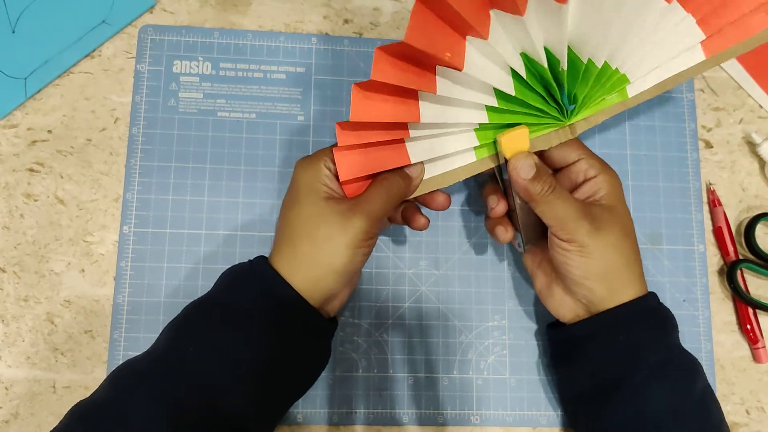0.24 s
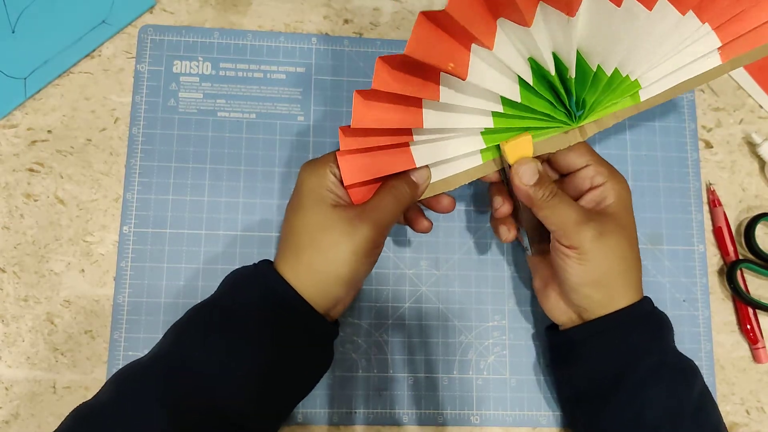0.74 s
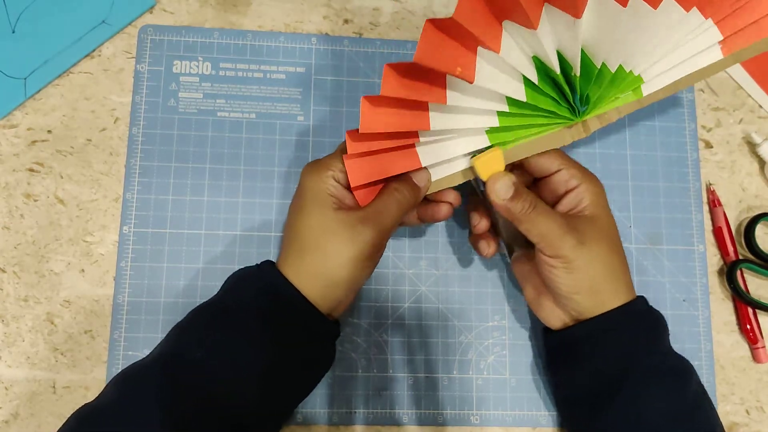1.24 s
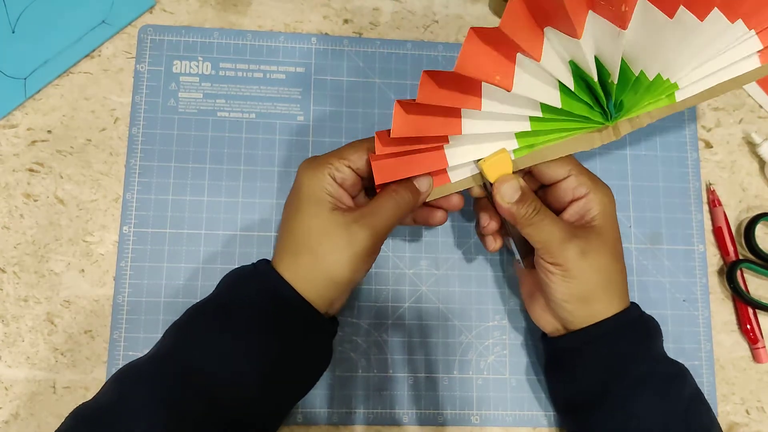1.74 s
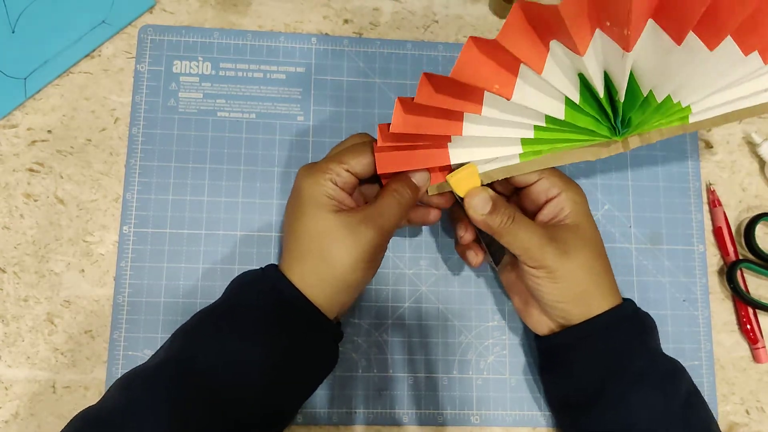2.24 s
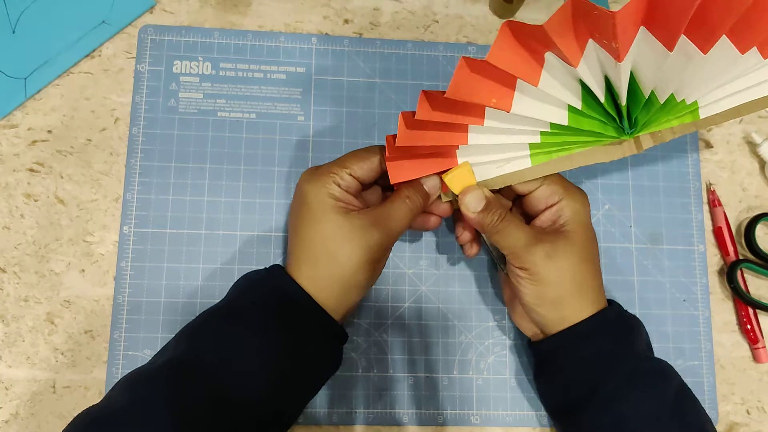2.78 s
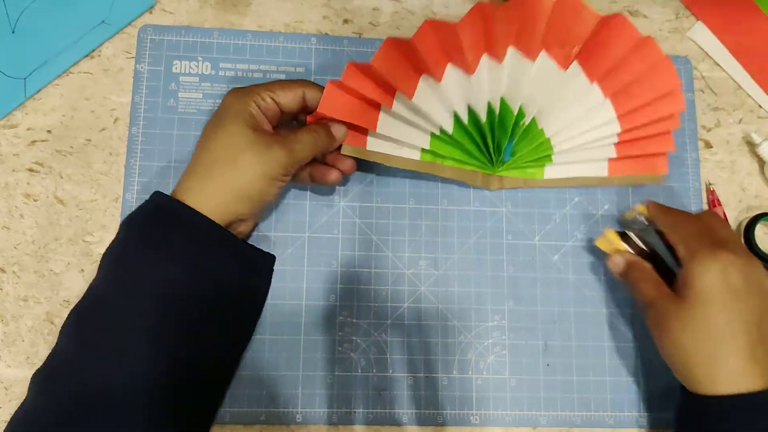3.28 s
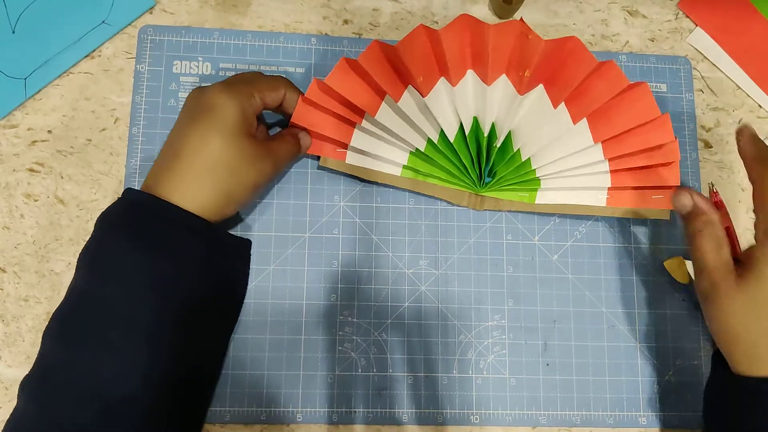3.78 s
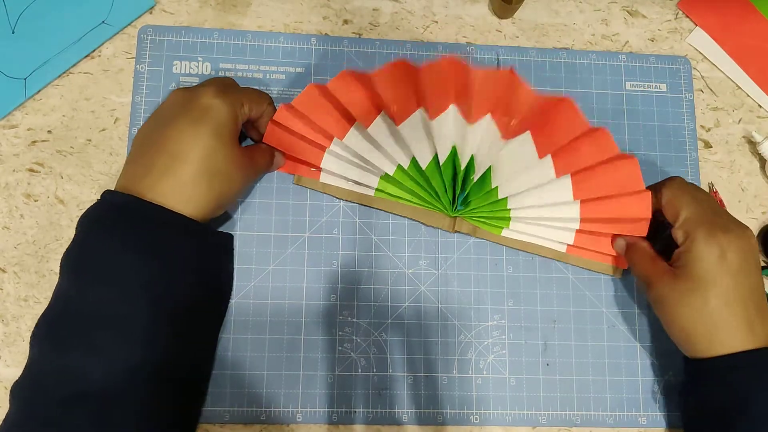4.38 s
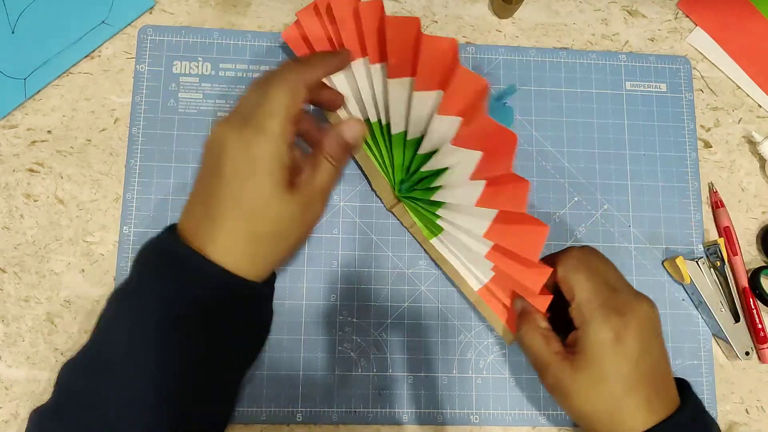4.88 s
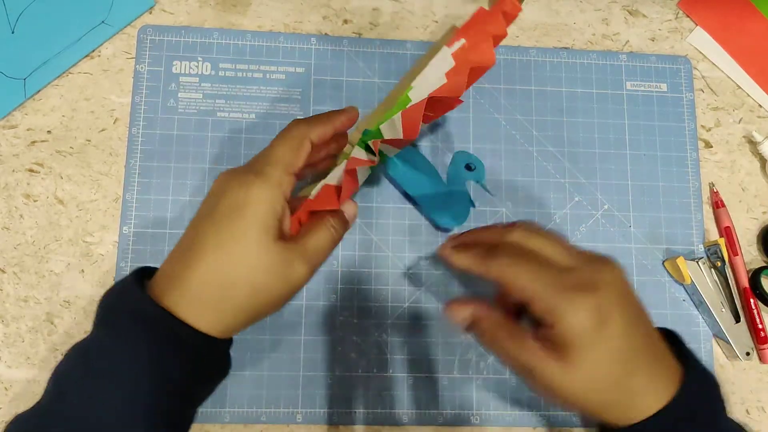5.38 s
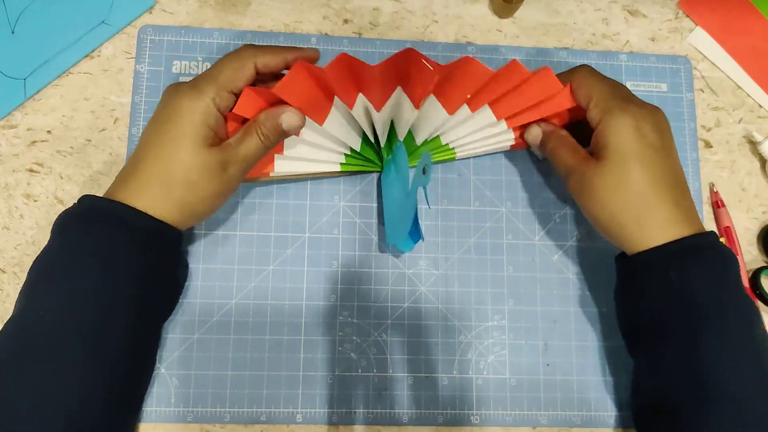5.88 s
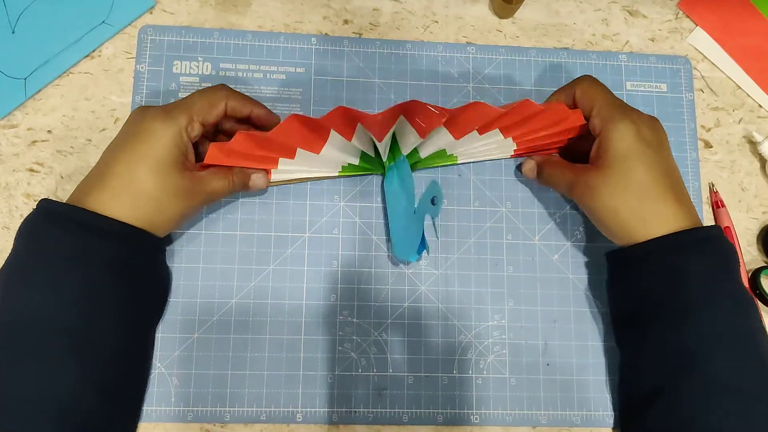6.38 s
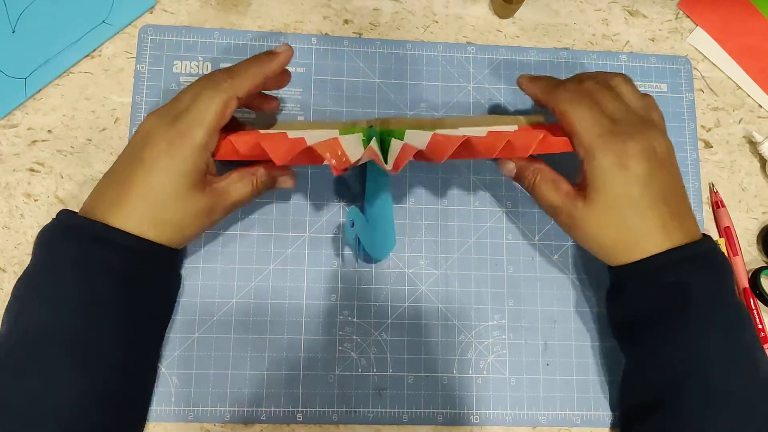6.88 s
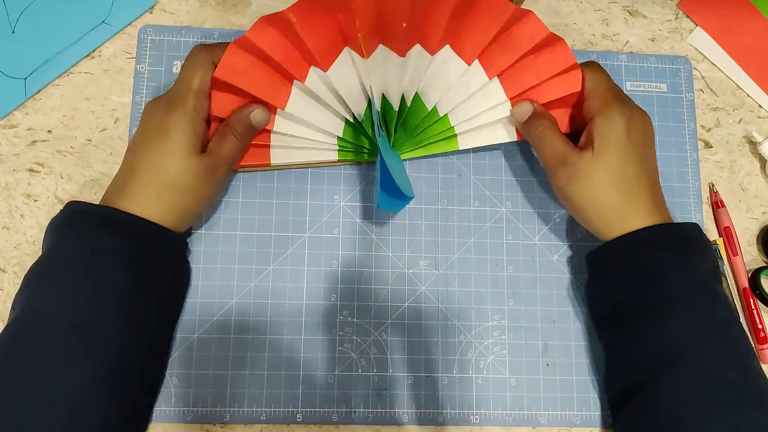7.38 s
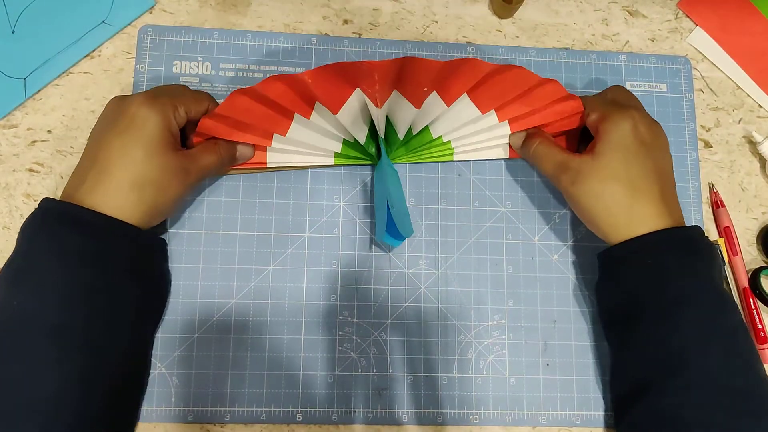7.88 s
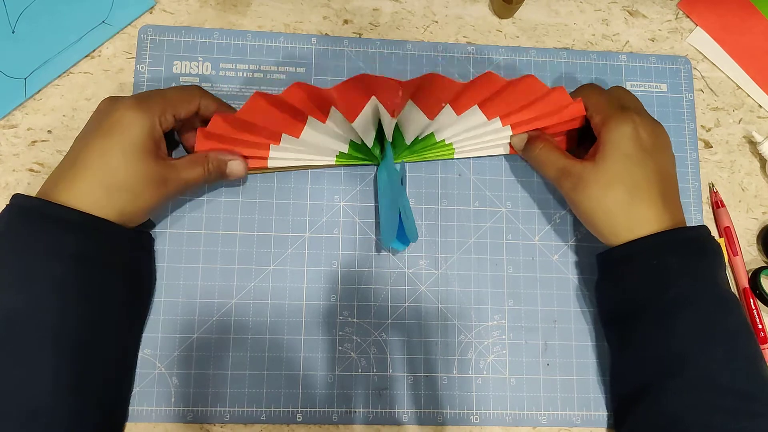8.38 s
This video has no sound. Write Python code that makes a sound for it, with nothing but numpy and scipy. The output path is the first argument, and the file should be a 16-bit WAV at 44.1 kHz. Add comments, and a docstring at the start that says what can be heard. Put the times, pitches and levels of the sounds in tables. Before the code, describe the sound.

Three sharp stapler snaps and a clack as it is put down, followed by quiet rustling and crinkling of pleated paper.

```python
"""Stapling a paper fan

At a craft table in a bare room, a small steel stapler snaps three times through a pleated paper fan
and is laid down; the fan is then turned and flexed by hand. Paper rustles, pleats drum, the table thuds.
Behind them, mains hum and a faint rumble swell and sink with the handling as the noise suppressor
on the camera's stereo microphone opens and shuts."""
import sys
import numpy as np
from scipy import signal
from scipy.fft import rfft, irfft, next_fast_len
from scipy.io import wavfile
from scipy.ndimage import uniform_filter1d, map_coordinates

SR = 44100
rng = np.random.default_rng(int(sys.argv[2]) if len(sys.argv) > 2 else 0)


def put_to_file(sound):
    """Save the sound as 16-bit audio at rate SR, in the file named by the first command-line argument."""
    columns = np.atleast_2d(sound).T  # one column per channel
    safe = np.clip(columns, -1, 1)
    whole_steps = np.round(safe * 32767)
    wavfile.write(sys.argv[1], SR, whole_steps.astype(np.int16))


N = 380583

# staples driven home: t/s, level/dB, then relative pleat knock/dB, spring/dB, thud/dB, air swing/dB
STAPLES = [(0.9938, -15.5, -11, -3.5, -26.5, 0.8), (1.9055, -10, -15.5, -0.5, -24, -4.5),
           (2.765, -11, -2.5, -5, -22.5, -9.5)]
# the fan jerks toward or away from the microphone: one sign per staple
SWING_DIRECTIONS = [-1, 1, 1]
# the stapler's jaws spring open or jingle: t/s, level/dB
JAW_RELEASES = [(1.1974, -35.5), (1.3745, -48), (2.112, -33.5), (2.9658, -38), (3.5868, -36.5)]
# small contacts and creases: t/s, level/dB, relative pleat knock/dB, thud/dB, tilt/(dB per octave)
CONTACTS = [(0.1524, -72, 21, -22, -3), (0.7363, -53.5, 11.5, -21, -6), (1.4524, -69, 29.5, -3, 2.5),
            (1.477, -50.5, 4, -24, -4), (2.4782, -76.5, 24.5, 9, -2.5), (2.5511, -53.5, 4, -20, -11),
            (2.5941, -54, 9, -11.5, -11.5), (3.2211, -44.5, -8, -24, 0.3), (3.2953, -37.5, -14, -15, -4.5),
            (3.3428, -44.5, 6.5, -13, -3.5), (3.4386, -50.5, 11.5, -28, 0.9),
            (3.5862, -25.5, -17, -25, 3.5), (3.609, -35.5, -6, -12, 2), (3.6286, -16.5, -17, -9.5, -1),
            (3.7769, -42, -6, -4.5, -4), (3.9713, -39, -17, -11, -.6), (4.2381, -34, -11, -38, -3.5),
            (4.4018, -38, 8.5, -9.5, -4.5), (4.4806, -38.5, -14, -32, -0.6), (4.686, -60, 14.5, -36, -1),
            (5.8121, -50, 3, -11.5, -7), (5.9, -49, -7, -16, -1.5), (6.072, -39, -19, -23, -0.5),
            (6.153, -48, 1, -23, 3), (6.2716, -50, 9, -2.8, 3), (6.5152, -40, -6, -4.5, -4.5),
            (6.5344, -38.5, -14, -23, -6), (6.7735, -43, -6, -22, -4), (6.8963, -50.5, -3, -25, -4.5),
            (6.9388, -35.5, 4.5, -14, -5), (7.1847, -44.5, 4, -19, -3), (7.406, -27.5, -6.5, -18.5, -1),
            (7.4445, -36, -8, -21, 1.5), (7.4789, -40, -14, -10, -4), (7.7029, -32.5, -1, -6.5, -3.5),
            (8.083, -39.5, -23.5, -37, -3)]
# finger slides and flexes of the fan: t/s, length/s, hiss level/dB, drumming level/dB
HAND_STROKES = [(.14, .08, -72.5, -67.5), (.28, 0.14, -73, -74), (.58, 0.098, -87.5, -78.5),
                (1.24, 0.13, -54, -59.5), (1.489, 0.39, -61.5, -74), (2.166, 0.22, -57, -62.5),
                (2.547, .12, -70.5, -70), (2.993, 0.075, -57, -61), (3.146, .25, -59.5, -64),
                (3.442, 0.34, -58.5, -69), (3.764, .14, -64.5, -60.5), (3.954, 0.089, -50.5, -49),
                (4.039, 0.075, -47.5, -42), (4.228, 0.116, -51, -47.5), (4.4, 0.047, -57, -64),
                (4.453, 0.63, -52.5, -55), (5.174, 0.12, -62.5, -71), (5.219, 0.087, -59.5, -69),
                (5.324, 0.097, -65, -66.5), (5.509, 0.157, -67, -70), (5.719, 0.04, -64.5, -63.5),
                (5.826, 0.21, -59.5, -61.5), (6.09, 0.2, -50.5, -56), (6.246, 0.287, -52.5, -58.5),
                (6.495, 0.027, -39, -40.5), (6.679, 0.12, -48.5, -51.5), (6.927, .33, -50.5, -54),
                (7.326, 0.069, -51.5, -60), (7.377, 0.37, -45, -49.5), (7.678, 0.021, -45.5, -43.5),
                (7.769, .19, -52.5, -56.5), (8.02, 0.047, -65, -64), (8.267, 0.077, -62, -62.5),
                (8.332, 0.14, -56, -61.5), (8.544, .1, -63, -69.5)]
# a hand settles on the table: t/s, level/dB
HAND_BUMPS = [(3.522, -31), (3.783, -56), (6.269, -49)]
# knocks on the fan's card spine: t/s, level/dB
SPINE_TAPS = [(0.996, -42.5), (1.91, -35), (2.769, -48), (4.051, -54.5), (6.504, -41.5), (6.94, -47.5),
              (7.4, -62), (7.7, -55)]

# modes of the stapler's spring: f/Hz, level/dB, t60/s
SPRING_MODES = [(5680, -6, 0.033), (2770, -2, 0.012), (1785, -8, 0.028)]
# modes of the table top: f/Hz, level/dB, t60/s
TABLE_MODES = [(100.7, 1.5, 0.42), (182, -4, 0.17), (296.2, -10.5, 0.19), (430, -9.5, 0.093),
               (1290, 1, 0.033)]
# modes of the hollow spine: f/Hz, level/dB, t60/s
SPINE_MODES = [(402, 2, 0.14), (470, -3.5, 0.12), (513, -1, 0.27), (564, -0.5, .15)]
# air pockets in the pleats: f/Hz, width/Hz, level/dB
PLEAT_RESONANCES = [(403, 12, -2.5), (569, 180, -1.5), (662, 52, 7.5), (795, 68, -1.5), (1083, 66, -14)]
# spectrum of a crack: f/Hz, level/dB
CRACK_SPECTRUM = [(180, -52), (300, -31.5), (645, -5.5), (1460, -10), (4440, -8), (5610, -6.5), (6100, -8),
                  (14700, -23), (16000, -32.5)]
# spectrum of sliding paper: f/Hz, level/dB
PAPER_SPECTRUM = [(530, -44.5), (900, -2.5), (1370, -6.5), (1990, -2), (2760, -7), (5960, -2),
                  (8050, -12.5), (14700, -21), (16000, -24.5)]
# spectrum of the table top's rattle: f/Hz, level/dB
RATTLE_SPECTRUM = [(120, -30), (200, 3), (300, -8), (420, -7.5), (600, -7.5), (1300, -10), (2500, -43.5)]

# decay of the bare room: f/Hz, t60/s
ROOM_DECAY = [(200, 0.72), (600, 0.45), (2000, 0.54), (6000, 0.42), (14000, .33)]
# colour of the room's tail: f/Hz, level/dB
ROOM_SPECTRUM = [(150, 1), (500, -2.5), (1500, -5), (6000, -2.5), (9000, -2.5), (15000, 2.5)]
# lines of the hum: f/Hz, level/dB
HUM_LINES = [(121.6, 3.5), (108.4, -1.5)]
# spectrum of the background rumble: f/Hz, level/dB
RUMBLE_SPECTRUM = [(15, -3), (40, -6.5), (70, -10), (160, -17.5), (260, -15.5), (400, -21), (1000, -40)]
# likeness of left and right at the microphone: f/Hz, correlation
STEREO_LIKENESS = [(100, 1), (400, 0.81), (1500, .4), (5000, -0.08), (14000, -.1)]

EVENT_SAMPLES = 3 * SR // 4


def stapler():
    """A staple shears off and punches through: crack, spring ring, pleat knock, thud, a swing of air."""
    out, t = np.zeros((2, N)), np.arange(EVENT_SAMPLES) / SR
    jaw_time = np.clip(t - .003, 0, 1)  # the jaws meet just after the first crack
    u = t / .036  # time on the scale of the air swing
    air = (1 - np.exp(-4 * u)) * (1 - u) * np.exp(-.8 * u)
    for (start, db, knock_db, spring_db, thud_db, swing_db), sign in zip(STAPLES, SWING_DIRECTIONS):
        blow = crack(t, rise=.0028, hold=.0035, t60=.03)
        blow += amp(spring_db) * ring(SPRING_MODES, jaw_time, attack=.00017)
        blow += amp(knock_db) * np.roll(pleat_knock(t), round(.004 * SR))
        blow = in_room(blow, wet_db=-.5)
        thud = amp(thud_db) * ring(TABLE_MODES, t, attack=.0027)
        swing = sign * amp(swing_db) * air * amp([[4], [-9]])  # mostly on the left microphone port
        add(out, start - .002, amp(db) * (blow + thud + swing))
    for start, db in JAW_RELEASES:
        jingle = crack(t, rise=.001, hold=.003, t60=.015) + ring(SPRING_MODES, t, attack=.0005)
        add(out, start, amp(db) * in_room(jingle, wet_db=-6))
    return out


def crack(t, rise, hold, t60):
    """Stereo cracking noise swells, holds for a moment, then dies fast."""
    envelope = np.clip(t / rise, 0, 1) ** 2 * amp(-60 * np.clip(t - hold, 0, 1) / t60)
    noise = spread(rng.standard_normal((2, len(t))), CRACK_SPECTRUM)
    return unit(noise * envelope) * np.sqrt(np.mean(envelope ** 2))


def contacts():
    """Each small contact cracks, knocks the pleats and thuds on the table in its own mix."""
    out, t = np.zeros((2, N)), np.arange(EVENT_SAMPLES) / SR
    for start, db, knock_db, thud_db, tilt_db in CONTACTS:
        snap = crack(t, rise=.0007, hold=.002, t60=.014)
        tick = filtered(snap, lambda hz: amp(tilt_db * np.log2(hz / 4000 + .17)))
        tick += amp(knock_db) * pleat_knock(t)
        add(out, start, amp(db) * (in_room(tick, wet_db=-1.5) + amp(thud_db) * table_thud(t)))
    return out


def paper_rustle():
    """Paper slides and flexes: clumped tiny creases on a patchy hiss, and both drum on the pleats."""
    crease_chance = 90 / SR * amp(3 * wobble(14))
    sizes = (rng.random(N) < crease_chance) * amp(np.minimum(5 * rng.exponential(1, N), 9))
    scratch = amp(-60 * np.arange(600) / SR / .053)  # envelope of one crease
    creases = np.convolve(sizes, scratch)[:N] * rng.standard_normal((2, N))
    sliding = rng.standard_normal((2, N)) * amp(2.4 * wobble(25))
    friction = amp(-5) * unit(creases) + sliding
    hiss = unit(shifting_folds(spread(friction, PAPER_SPECTRUM), depth_db=1.5))
    push = spread(friction * amp(1.2 * wobble(30)), [(100, 0)])  # flat spectrum
    drumming = unit(filtered(push, pleat_response))
    hiss_gain, drum_gain = stroke_gains()
    return hiss_gain * hiss + drum_gain * drumming


def stroke_gains(attack_s=.022, sag_db_per_s=17.5, release_db_per_s=139.5):
    """Gains of hiss and drumming: each stroke of the hand swells in, sags while it lasts and dies away."""
    power, t = np.zeros((2, N)), np.arange(SR + SR // 2) / SR
    for start, length, hiss_db, drum_db in HAND_STROKES:
        fall_db = sag_db_per_s * t + release_db_per_s * np.clip(t - length, 0, None)
        envelope = np.clip(t / attack_s, 0, 1) * amp(-fall_db)
        add(power, start, (amp([[hiss_db], [drum_db]]) * envelope) ** 2)
    return np.sqrt(power)


def shifting_folds(x, depth_db):
    """Different folds sound in turn: a random gain over time and frequency."""
    spectra = signal.stft(x, nperseg=256)[2]
    patches = uniform_filter1d(rng.standard_normal(spectra.shape[1:]), size=8, axis=0)
    patches = uniform_filter1d(patches, size=12, axis=1)
    return signal.istft(spectra * amp(depth_db * unit(patches)), nperseg=256)[1][:, :N]


def pleat_knock(t):
    """A short push drums on the pleats; peak 1."""
    push = amp(-60 * t / .006) * rng.standard_normal(len(t))
    knock = filtered(push, pleat_response)
    return knock / np.abs(knock).max()


def pleat_response(hz):
    """The air pockets of the folded paper resonate, in alternating polarity."""
    return sum((-1) ** k * amp(db) * 1j * hz * width / (centre ** 2 - hz ** 2 + 1j * hz * width)
               for k, (centre, width, db) in enumerate(PLEAT_RESONANCES))


def bumps_and_taps():
    """Soft bumps wake only the table's lowest mode; taps ring the hollow spine of the fan."""
    out, t = np.zeros((2, N)), np.arange(EVENT_SAMPLES) / SR
    for start, db in HAND_BUMPS:
        add(out, start, amp(db) * ring(TABLE_MODES[:1], t, attack=.034)[None])
    for start, db in SPINE_TAPS:
        tap = np.tile(ring(SPINE_MODES, t, attack=.0028), (2, 1))
        add(out, start, amp(db) * in_room(tap, wet_db=-4.5))
    return out


def table_thud(t, rattle_db=-2):
    """The table top booms on its modes and rattles as it settles."""
    noise = unit(spread(rng.standard_normal((2, len(t))), RATTLE_SPECTRUM))
    rattle = noise * amp(-60 * t / .33) * (1 - np.exp(-t / .002))
    return ring(TABLE_MODES, t, attack=.0058) + amp(rattle_db) * rattle


def in_room(x, wet_db, delay_s=.0076):
    """The room's tail reaches the microphone after x, in its broad colour, each band at its own decay."""
    n = x.shape[1]
    hz, t, spectra = signal.stft(rng.standard_normal((2, n)), SR, nperseg=256)
    decay = amp(-60 * t / along(ROOM_DECAY, hz)[:, None])
    tail = signal.istft(spectra * decay, SR, nperseg=256)[1]
    tail = np.pad(spread(tail, ROOM_SPECTRUM), ((0, 0), (round(delay_s * SR), 0)))[:, :n]
    tail /= np.linalg.norm(tail[0])
    bin_hz, power = np.fft.rfftfreq(n, 1 / SR), np.abs(rfft(x[0])) ** 2
    # many paths blur the fine spectrum, most of all in the treble
    power = np.where(bin_hz < 1200, uniform_filter1d(power, 110), uniform_filter1d(power, 700))
    return x + amp(wet_db) * filtered(tail, lambda f: np.sqrt(np.abs(np.interp(f, bin_hz, power))))


def hum_and_rumble():
    """Behind the handling, two wavering hum lines beat over a rumble."""
    t = np.arange(N) / SR
    stereo_phase = np.array([[.2], [-.2]])
    hum = sum(amp(db + 3 * wobble(7.8)) * np.sin(2 * np.pi * hz * t + .4 * wobble(1.3) + stereo_phase)
              for hz, db in HUM_LINES)
    rumble = unit(spread(rng.standard_normal((2, N)), RUMBLE_SPECTRUM)) * amp(2.2 * wobble(6))
    return hum + rumble


def suppressor_gain(front, shut_db=-82, open_db=-46.5, follow_s=.11, floor_db=-83.5, db_per_db=.74):
    """The noise suppressor holds the background down and lets go slowly while the front is loud."""
    power = uniform_filter1d(np.mean(front ** 2, axis=0), size=1300)
    excess_db = np.clip(10 * np.log10(np.abs(power) + 1e-20), shut_db, open_db) - shut_db
    step = 1 / (follow_s * SR)
    followed_db = signal.lfilter([step], [1, step - 1], excess_db)
    return amp(floor_db + db_per_db * followed_db)


def ring(modes, t, attack):
    """One blow on a set of modes, each at a new strength."""
    tones = sum(amp(db + rng.normal(0, 2) - 60 * t / t60) * np.sin(2 * np.pi * hz * t)
                for hz, db, t60 in modes)
    return tones * (1 - np.exp(-t / attack))


def spread(pair, spectrum):
    """Two unrelated signals become a coloured left and right, more alike in the bass."""
    def mid_side_gains(hz):
        angle = np.arccos(along(STEREO_LIKENESS, hz)) / 2
        return amp(along(spectrum, hz)) * [np.cos(angle), np.sin(angle)]
    mid, side = filtered(pair, mid_side_gains)
    return np.array([mid + side, mid - side])


def filtered(x, response):
    """x through a frequency response."""
    size = next_fast_len(x.shape[-1] + 8192)
    return irfft(rfft(x, size) * response(np.fft.rfftfreq(size, 1 / SR)), size)[..., :x.shape[-1]]


def along(points, hz):
    """(f/Hz, value) points read on a log frequency axis."""
    freqs, values = np.transpose(points)
    return np.interp(np.log(hz + 1), np.log(freqs + 1), values)


def wobble(rate):
    """A smooth random curve, rate knots a second."""
    return map_coordinates(rng.standard_normal(int(N * rate / SR) + 4), [np.arange(N) * rate / SR])


def amp(db):
    """dB to gain."""
    return 10 ** (np.asarray(db) / 20)


def unit(x):
    """x at rms 1."""
    return x / np.sqrt(np.mean(x ** 2) + 1e-20)


def add(out, start, x):
    """Mixes x into out from start, in seconds."""
    part = out[:, round(start * SR):][:, :x.shape[1]]
    part += x[:, :part.shape[1]]


def scene():
    """The work on the table in front, hum and rumble let through behind it."""
    front = stapler() + contacts() + bumps_and_taps() + paper_rustle()
    return front + suppressor_gain(front) * hum_and_rumble()


def record(dry):
    """The microphone lifts the top octave a little; the camera keeps nothing above its band limit."""
    top_hz, slope_hz = 16200, 600
    lift = [(8000, -1.5), (11000, -.8), (14000, 1.5)]  # f/Hz, level/dB
    return filtered(dry, lambda hz: np.clip((top_hz - hz) / slope_hz, 0, 1) ** 2 * amp(along(lift, hz)))


dry = scene()
out = record(dry)
put_to_file(out)
```